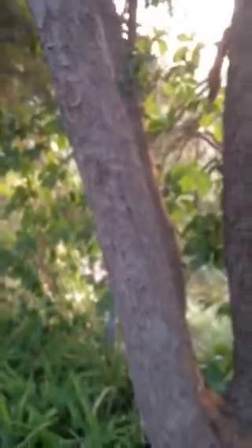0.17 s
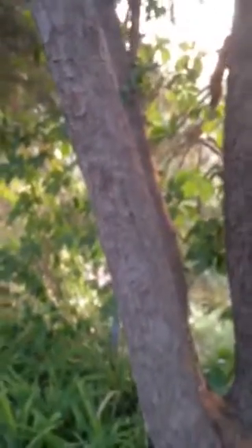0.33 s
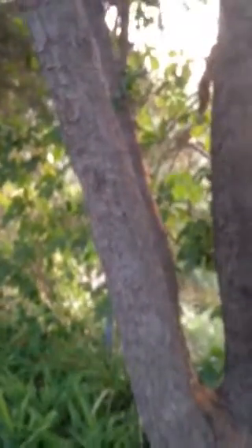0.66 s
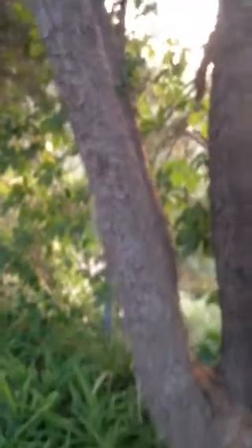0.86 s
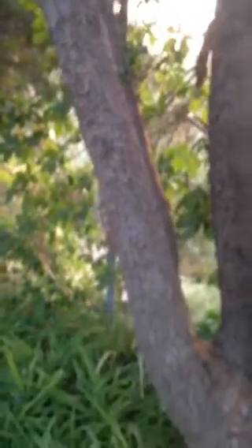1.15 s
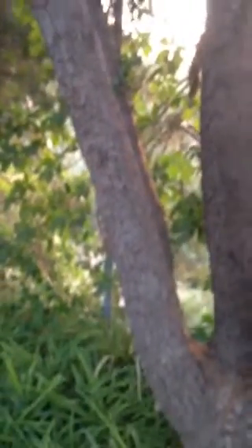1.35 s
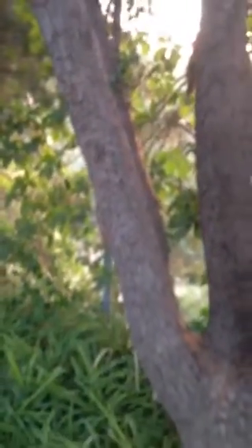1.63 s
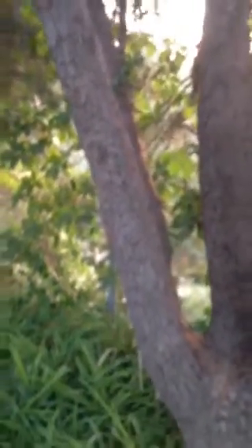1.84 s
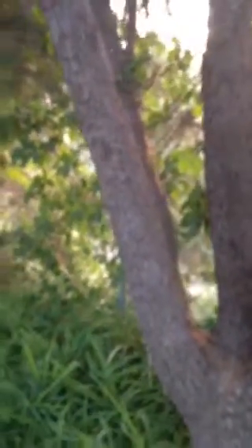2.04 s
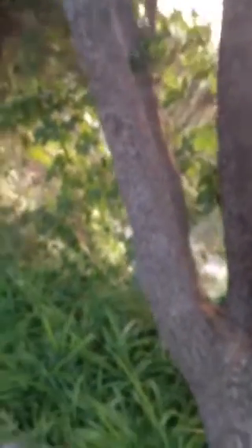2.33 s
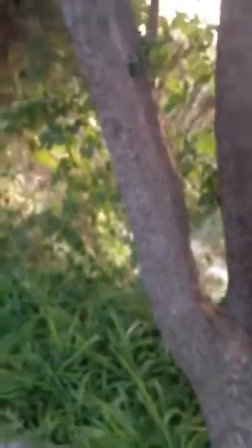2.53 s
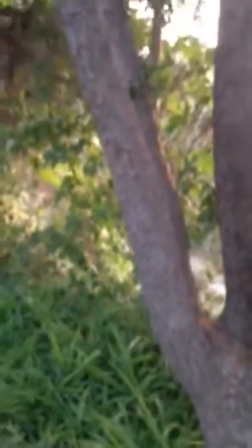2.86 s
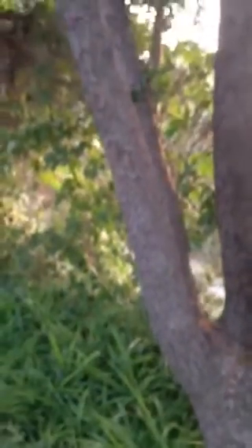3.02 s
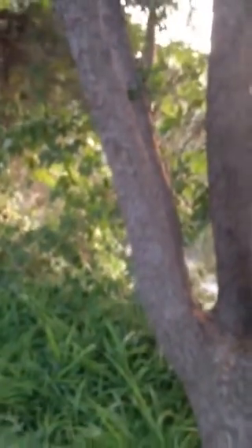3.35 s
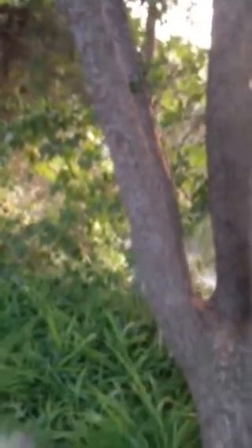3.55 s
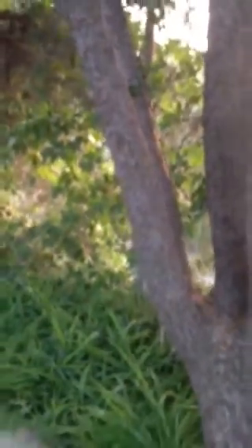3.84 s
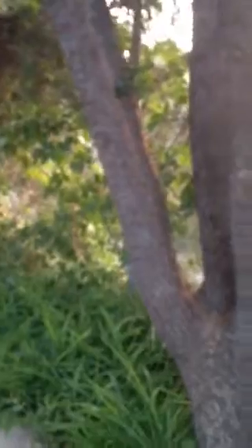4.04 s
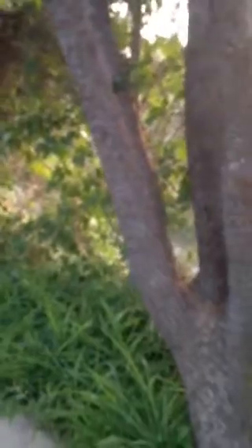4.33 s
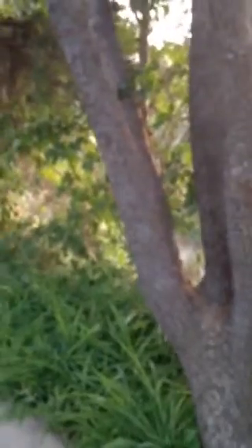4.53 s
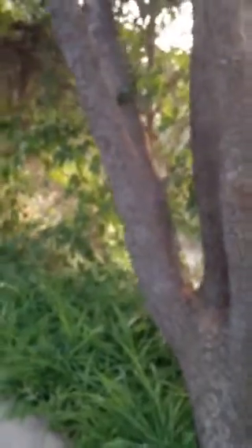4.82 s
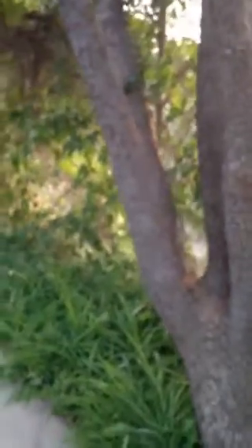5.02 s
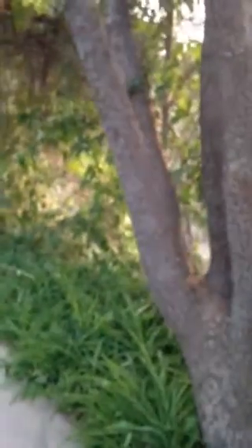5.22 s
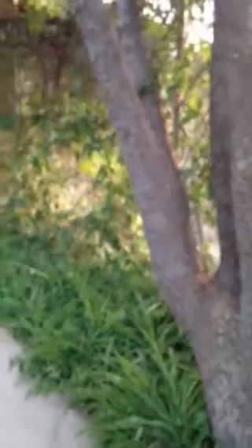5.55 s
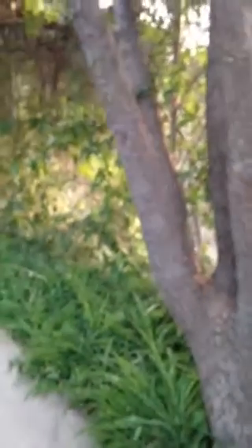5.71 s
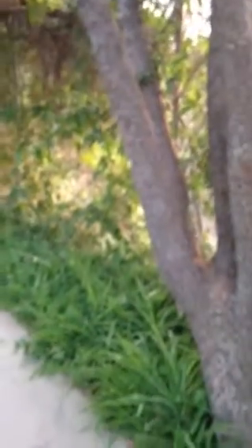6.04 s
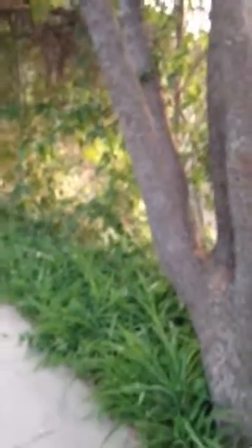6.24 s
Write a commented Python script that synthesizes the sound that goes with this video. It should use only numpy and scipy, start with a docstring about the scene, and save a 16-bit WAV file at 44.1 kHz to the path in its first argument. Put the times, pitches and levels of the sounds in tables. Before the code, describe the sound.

A cicada sings loudly close by in a quiet garden, harsh buzzing phrases about two a second with tiny gaps, over very faint distant cicadas.

```python
"""A cicada sings on a tree close by, in even phrases about two a second, in a quiet garden.
Its two tymbals buckle in turn, each rib's snap ringing the body as a short resonant click;
as the muscles tighten the clicks speed up and ring higher, then slacken again.
Delayed copies and a scattered tail reflect the song from trunk, ground and leaves.
Shaped noise makes the far cicadas, faint rustles and a low hum of the town with traffic."""
import sys
import numpy as np
from scipy import signal
from scipy.fft import rfft, irfft
from scipy.io import wavfile
from scipy.ndimage import map_coordinates

SR = 44100
rng = np.random.default_rng(int(sys.argv[2]) if len(sys.argv) > 2 else 0)


def transcribe(signal):
    """Save signal, clipped to [-1, 1], as a 16-bit WAV file at the path in sys.argv[1]."""
    frames = np.atleast_2d(signal).T
    limited = np.clip(frames, -1, 1)
    pcm = np.round(limited * 32767).astype(np.int16)
    wavfile.write(sys.argv[1], SR, pcm)


N = 281358
TIME = np.arange(N) / SR  # s

# Song phrases: (start [s], end [s], nominal level [dB], fade at the end [dB])
SONG_PHRASES = [(-0.31, 0.066, -19.5, -3), (0.152, 0.532, -19.5, -4.5), (0.615, 0.986, -20.0, -3.5),
                (1.078, 1.456, -18.5, -6.5), (1.551, 1.939, -19.5, -6.1), (2.035, 2.418, -21, -4),
                (2.497, 2.863, -22, -3.0), (2.944, 3.349, -20.0, -9), (3.439, 3.853, -22.5, -4.5),
                (3.94, 4.338, -23.8, -2.5), (4.419, 4.82, -22.5, -3.5), (4.9, 5.29, -23.5, -4),
                (5.381, 5.811, -24.5, -1.5), (5.897, 6.297, -24.5, -2.1), (6.367, 6.769, -22.5, -3)]
# Ribs that snap in one stroke of each tymbal:
# (nominal delay [ms], relative strength [dB], ring frequency [factor], random spread of delay [ms])
LEFT_TYMBAL_RIBS = [(0, 1, 1.0037, 0.019), (1.298, -4, 1.0, 0.053), (2.1, -12, 1.4, 0.086)]
RIGHT_TYMBAL_RIBS = [(0, 0, 1.0107, 0.014), (1.198, -6, .99, 0.07), (2.001, -12, 1.407, 0.076)]


def cicada():
    """Alternating excitation: left and right tymbals take turns, not quite evenly."""
    twitches = np.vstack([strokes(phrase) for phrase in SONG_PHRASES])
    is_right = twitches[:, 3] > 0
    left = tymbal(twitches[~is_right], LEFT_TYMBAL_RIBS, lag_ms=0)
    right = tymbal(twitches[is_right], RIGHT_TYMBAL_RIBS, lag_ms=0.099)
    return left + right


# The muscles spin up from a slack pace, tire a little, and run down before the phrase ends.
SLACK_PER_S, SPIN_UP_S, TIRE_PER_S2, RUN_DOWN_S = 158, .022, 18, .035
TOP_PER_S = 225.5  # clicks per s at full effort before tiring, both tymbals together
# Their force swells from SLACK_DB below the phrase's level, holds, and fades.
SLACK_DB, SWELL_S, FADE_S = -9, 0.026, 0.052
# The first twitch is a hard snap, the second tymbal catches weakly, the last twitch is feeble.
FIRST_DB, CATCH_DB, LAST_DB = 4.5, -4.5, -5.5
# Tension arches over each phrase, as a factor on the ring frequency.
SLACK_RING, TAUT_RING = 0.95, 1


def strokes(phrase):
    """Muscle drive: the integral of twitch rate sets the times; rows (time [s], size, tension, side)."""
    start, end, level_db, fade_db = phrase
    length = end - start
    t = np.arange(0, length, 1 / SR)
    spin_up = 1 - np.exp(-(t / SPIN_UP_S) ** 2)
    run_down = 1 - np.exp((t - length) / RUN_DOWN_S)
    tired_top = TOP_PER_S - TIRE_PER_S2 * t
    rate = SLACK_PER_S + (tired_top - SLACK_PER_S) * spin_up * run_down

    # A twitch falls wherever the accumulated rate reaches a whole number.
    turns = np.cumsum(rate) / SR
    number = np.arange(int(turns[-1]) + 1)
    at = np.interp(number, turns, t)

    swell_db = SLACK_DB * np.exp(-at / SWELL_S)
    end_db = fade_db * np.exp((at - length) / FADE_S)
    db = level_db + swell_db + end_db
    db[[0, 1, -1]] += FIRST_DB, CATCH_DB, LAST_DB
    size = gain_of(db) * np.sqrt(SR / TOP_PER_S)  # offsets the sparseness of unit-energy clicks
    tension = SLACK_RING + (TAUT_RING - SLACK_RING) * np.sin(np.pi * at / length)
    return np.column_stack([start + at, size, tension, number % 2])


def tymbal(twitches, ribs, lag_ms, drift_ms=0.039, jitter_ms=0.027, uneven_db=1.0,
           rib_uneven_db=0.8, detune=0.0068, pace_swing=0.033, size=320):
    """Sequential buckling: each twitch snaps the ribs one after another, each snap ringing the body."""
    s, strength, tension = twitches[:, :3].T
    early, force = rng.standard_normal((len(s), 2)).T
    drift = drift_ms * np.interp(s, TIME, wander(8))
    s = s + (lag_ms + jitter_ms * early + drift) / 1e3
    rib_total = np.linalg.norm(gain_of(np.transpose(ribs)[1]))
    strength = strength * gain_of(uneven_db * force) / rib_total
    axis, shape = ring_shape()
    out = np.zeros(N)
    for delay_ms, db, pitch, spread_ms in ribs:
        late, hard, sharp = rng.standard_normal((len(s), 3)).T
        # The buckling runs across the ribs faster or slower.
        pace = 1 + pace_swing * np.interp(s, TIME, wander(12))
        snap = (s + (delay_ms * pace + spread_ms * late) / 1e3) * SR

        # Reading the shape faster raises the ring and shortens it.
        index = snap.astype(int)[:, None] + np.arange(size)
        ring_factor = tension * pitch * (1 + detune * sharp)
        age = (index - snap[:, None]) * ring_factor[:, None]

        # Later ribs vary more, and the cap leaves them more room to fall short.
        rib_db = db + rib_uneven_db * (1 + delay_ms) * np.minimum(hard, 1)
        click_gain = strength * gain_of(rib_db)
        click = np.interp(age, axis, shape, left=0) * click_gain[:, None]
        inside = (index >= 0) & (index < N)
        out += np.bincount(index[inside], click[inside], N)
    return out


# Ring of one click in tymbal and hollow abdomen, at tension and rib factors of 1:
# (frequency [Hz], relative spectrum level [dB])
BODY_RING = [(600, -109), (1550, -81), (1800, -41.5), (2200, -16), (2530, -22.5), (2900, -16),
             (3300, -27.5), (3850, -33), (4500, -1.5), (4800, -0.9), (4980, -6.5), (5250, -1.5),
             (5700, -20.5), (7000, -13.5), (7600, -13), (8300, -22), (9800, -27.5), (11100, -46),
             (12300, -28), (13300, -58)]


def ring_shape(abrupt=0.35, size=2048, order=8, count=60):
    """Resonance: a rib gives way gradually, so the ring swells for a few cycles before it dies.
    Returns a finely sampled click as (time [samples], pressure), with unit energy."""
    hz = abs(np.fft.fftfreq(size, 1 / SR))
    log_gain = np.log(gain_of(read(BODY_RING, hz)))
    # Only a share of the minimum phase is used: a full share would start at once.
    phase = -abrupt * signal.hilbert(log_gain).imag
    spectrum = np.exp(log_gain + 1j * phase)[:size // 2 + 1]
    # The shift leaves room for the swell ahead of the peak.
    shape = np.roll(irfft(spectrum, size * order), count * order)
    return np.arange(size * order) / order, shape / np.sqrt(np.sum(shape ** 2) / order)


# Reflections from trunk, branches and ground: (mean delay [ms], level [dB])
REFLECTIONS = [(1.7, -20), (3.3, -10), (6.2, -7.5), (9.4, -19)]


def garden(x, sway_ms=0.087, leaves_db=-15, t60=0.15):
    """Reflection and scattering: echoes shift as the microphone moves; leaves scatter a short tail."""
    out = x.copy()
    for delay_ms, db in REFLECTIONS:
        late = (delay_ms + sway_ms * wander(.8)) * SR / 1e3
        out += gain_of(db) * map_coordinates(x, [np.arange(N) - late], order=3)
    t = TIME[:SR // 2]
    decay = np.exp(-np.log(1000) * t / t60)  # falls 60 dB in t60 seconds
    build_up = 1 - np.exp(-t / 0.0042)
    tail = rng.standard_normal(len(t)) * decay * build_up
    scattered = signal.fftconvolve(x, tail / np.linalg.norm(tail))[:N]
    return out + gain_of(leaves_db) * scattered


# Blended spectrum of the far cicadas: (frequency [Hz], relative spectrum level [dB])
FAR_SPECTRUM = [(1500, -41), (2200, -17.5), (3000, -20), (3600, -20), (4200, -15), (4800, 1.5),
                (5300, -9.5), (6000, -19), (7100, -13), (8500, -27), (12000, -30), (14000, -45)]


def far_cicadas(level_db=-48, swell_db=1):
    """Incoherent superposition: many distant singers blur into a gently swelling hiss."""
    return noise(FAR_SPECTRUM) * gain_of(level_db + swell_db * wander(3.4))


# Faint rustles: (start [s], length [s], level at the top [dB])
RUSTLE_EVENTS = [(1.88, 0.077, -56.5), (3.459, 0.038, -59), (4.191, 0.048, -55.5)]


def rustles():
    """Friction noise: brief soft scrapes in the middle range, each under half a sine."""
    swell = np.zeros(N)
    for s, length, db in RUSTLE_EVENTS:
        swell += gain_of(db) * np.sin(np.pi * np.clip((TIME - s) / length, 0, 1))
    return swell * noise([(700, -28), (1150, 4), (1700, 4), (2500, -17), (5000, -35)])


# Spectrum of the town's hum: (frequency [Hz], relative spectrum level [dB])
TOWN_SPECTRUM = [(12, -45), (20, -25), (54, 0), (107, -2), (158, -7.5), (246, -1), (356, 1.5), (462, -1),
                 (719, -2.5), (1450, -9), (1650, -7), (2140, -20), (3630, -120)]
# (time of the top [s], half length [s], centre frequency [Hz], level before slow wander [dB])
TRAFFIC_SWELLS = [(3.05, 0.32, 173, -59.5), (4.97, 0.067, 200, -60), (5.25, 0.53, 247.7, -66),
                  (6.08, 0.29, 197.2, -62)]
# Levels at time 0, and their steady rise
TRAFFIC_DB, TRAFFIC_RISE_DB_PER_S = -76, 1.7
TOWN_DB, TOWN_RISE_DB_PER_S = -60.5, 0.34


def town(lumpy_db=2, skirt_db=-24):
    """Band-shaped noise: a low wash that slowly grows, with traffic that comes and goes."""
    murmur = noise([(110, -24), (165, -2.0), (205, -1.5), (280, -5.5),
                    (420, -14.5), (900, -28), (2000, -47)])
    traffic = murmur * gain_of(TRAFFIC_DB + TRAFFIC_RISE_DB_PER_S * TIME)
    octaves = np.arange(-5, 6)
    for s, half, hz, db in TRAFFIC_SWELLS:
        # Each drone's spectrum falls by skirt_db per octave away from its centre.
        drone = noise(np.column_stack([hz * 2. ** octaves, skirt_db * abs(octaves)]))
        swell = np.exp(-((TIME - s) / half) ** 2)
        traffic = traffic + gain_of(db) * swell * drone
    wash = gain_of(TOWN_DB + TOWN_RISE_DB_PER_S * TIME) * noise(TOWN_SPECTRUM)
    return wash + traffic * gain_of(lumpy_db * wander(6.3))


def noise(points):
    """Spectral shaping: white noise weighted by the given spectrum, with rms 1."""
    gain = gain_of(read(points, np.fft.rfftfreq(N, 1 / SR)))
    return evened(irfft(rfft(rng.standard_normal(N)) * gain, N))


def wander(per_s):
    """Superposed slow sines of random phase, none faster than per_s, with rms 1."""
    rates = np.geomspace(per_s / 10, per_s, 20)
    t = np.linspace(0, N / SR, 2048)
    sines = np.sin(2 * np.pi * (rates * t[:, None] + rng.random(len(rates))))
    slow = sines @ rates ** -.5
    return np.interp(TIME, t, evened(slow))


def read(points, hz):
    """Logarithmic frequency scale: a spectrum's dB, joined by straight lines on a log axis."""
    f, db = np.transpose(points)
    return np.interp(np.log(hz + 1), np.log(f + 1), db)


def gain_of(db):
    """Decibel law: 20 dB is a factor of ten in amplitude."""
    return 10 ** (np.asarray(db) / 20)


def evened(x):
    """Power normalization: scale to rms 1."""
    return x / np.sqrt(np.mean(x ** 2) + 1e-20)


def scene():
    """Linear superposition of the reflected song and its background, as one channel."""
    return (garden(cicada()) + far_cicadas() + rustles() + town())[None]


EDGE_HZ = 15400


def record(dry):
    """Band limiting: a symmetric low-pass filter cuts the treble above EDGE_HZ."""
    low_pass = signal.firwin(511, EDGE_HZ, window=("kaiser", 9), fs=SR)
    return signal.oaconvolve(dry, low_pass[None], "same")


dry = scene()
out = record(dry)
transcribe(out)
```